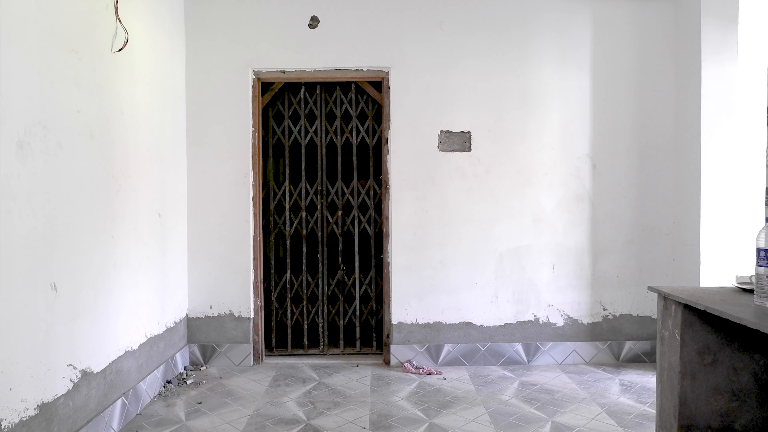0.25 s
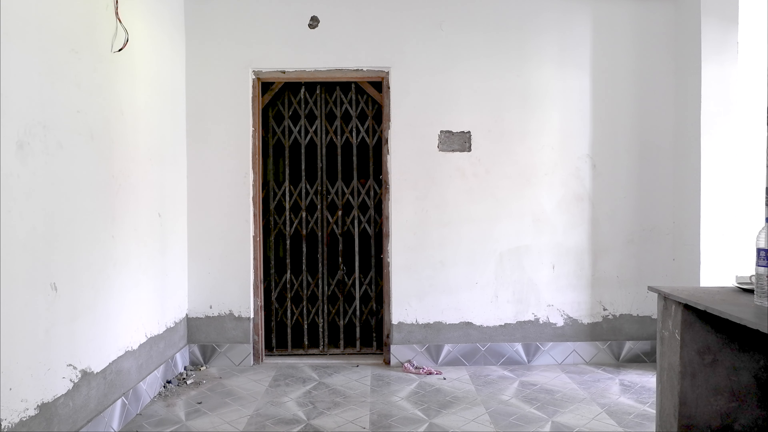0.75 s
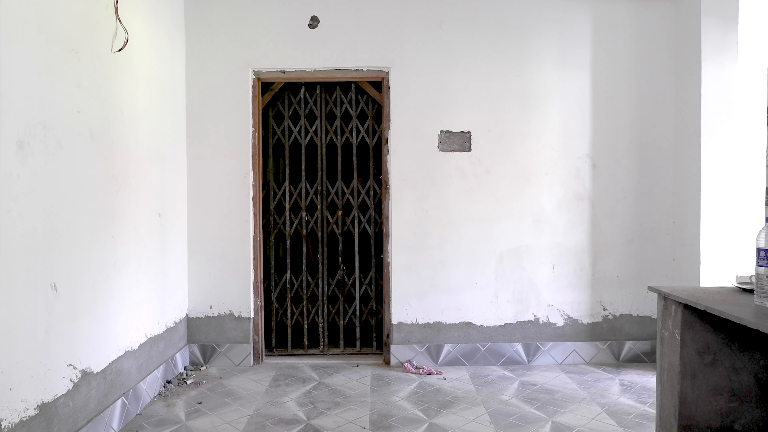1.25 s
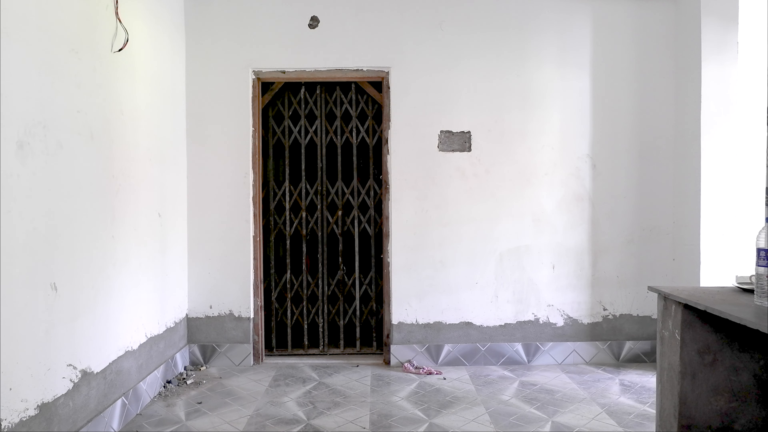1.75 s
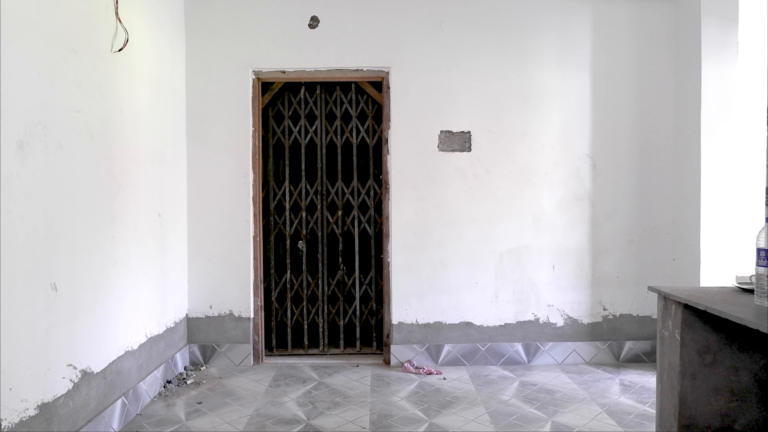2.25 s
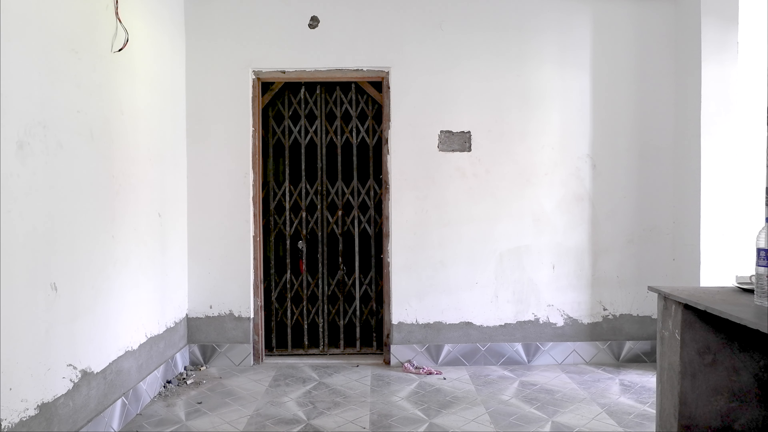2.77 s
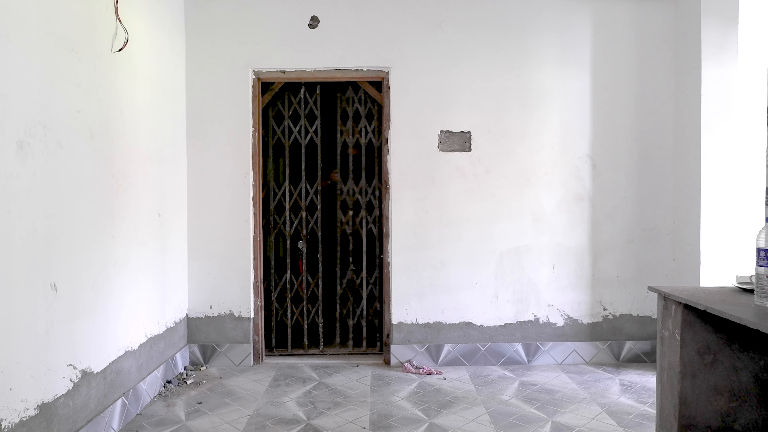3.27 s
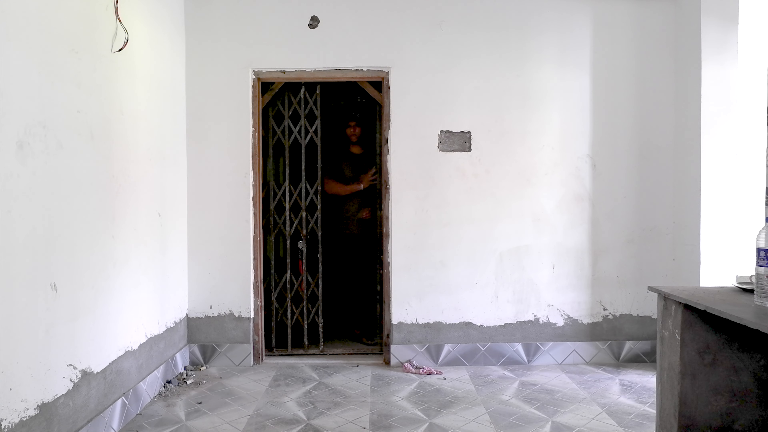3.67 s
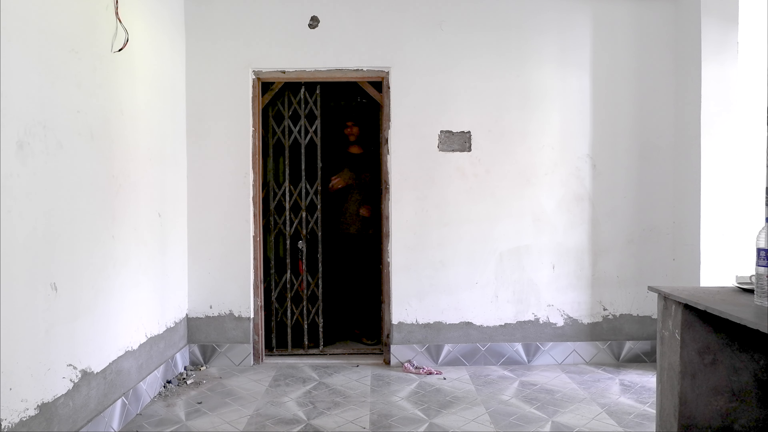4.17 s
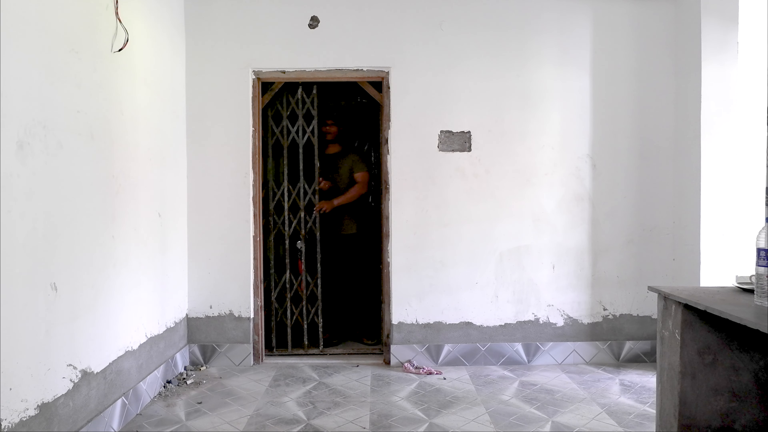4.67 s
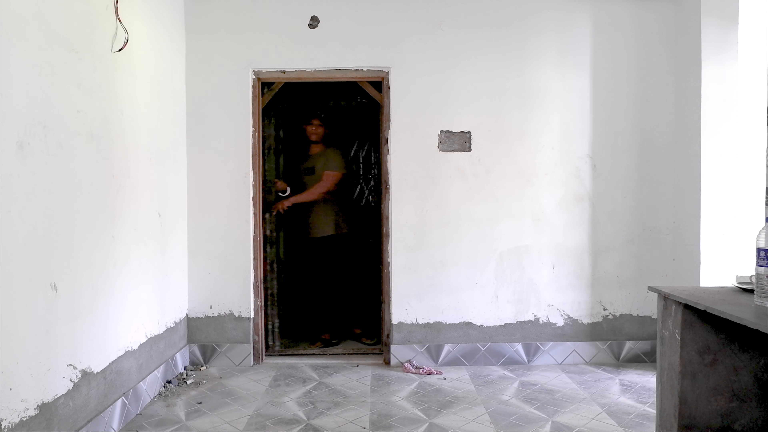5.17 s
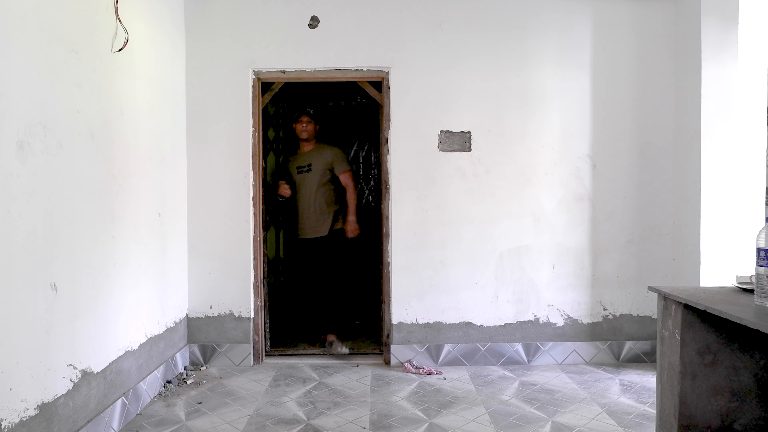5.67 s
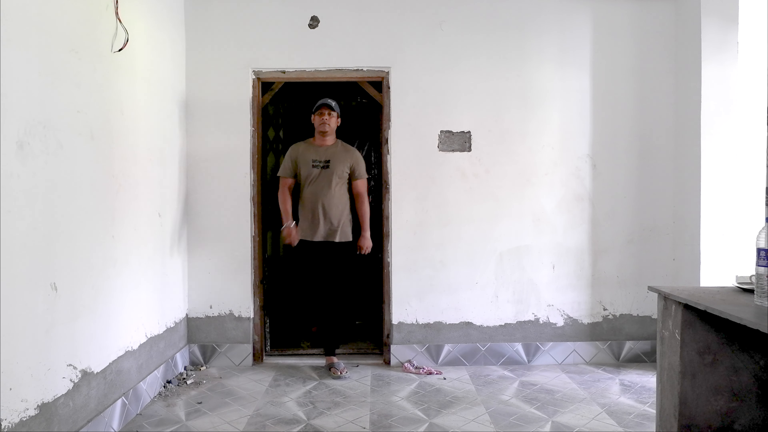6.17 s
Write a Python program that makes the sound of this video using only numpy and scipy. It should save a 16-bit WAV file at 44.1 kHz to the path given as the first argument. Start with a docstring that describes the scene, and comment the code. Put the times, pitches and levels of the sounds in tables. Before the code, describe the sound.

In a bare room with hard, echoing walls, a folding steel gate is unlatched a few metres away with sharp clacks, small clinks and short scrapes. One leaf rattles along its track and bumps in the frame. After a short lull the second leaf clatters aside with brief squeaks and a run of metallic strikes. A soft foot scuff follows, over quiet air and a faint drone.

```python
"""A steel latch scrapes and clacks free: a folding lattice gate, a few metres off in a bare plastered room.
Each leaf is pushed aside in turn. Stick-slip friction makes its runners grind and its links chatter,
and impacts excite the dense modes of the bars as they slam together. Last, a sandal brushes the floor.
The hard walls reverberate after every blow, over still air and a faint low drone."""
import sys
import numpy as np
from scipy import signal
from scipy.fft import rfft, irfft
from scipy.io import wavfile
from scipy.ndimage import uniform_filter1d

SR = 44100
rng = np.random.default_rng(int(sys.argv[2]) if len(sys.argv) > 2 else 0)


def pcm_store(signal):
    """Save signal as 16-bit PCM."""
    levels = np.round(np.clip(np.atleast_2d(signal), -1, 1) * 32767)
    wavfile.write(sys.argv[1], SR, levels.astype(np.int16).T)


N = 283641
T = np.arange(N) / SR
HZ = np.maximum(np.fft.rfftfreq(2 * N, 1 / SR), 1)

# spectrum of still air: frequency_hz, gain_db
AIR_SPECTRUM = [(15, -58), (25, -30.5), (107, -17), (156, -17), (188, -2), (260, -18), (289, -14),
                (469, -15.5), (762, -19), (997, -20), (2230, -27.5), (9550, -38), (10400, -39),
                (15500, -43)]
# bands of the drone: centre_hz, width_hz, gain_db
DRONE_BANDS = [(114.5, 9.4, -4.5), (187, 10.6, 1), (294, 25, -4.5)]
# stereo width of the background: frequency_hz, side_gain_db
AIR_SIDE = [(30, 1), (100, -35), (500, -18.5), (1000, -17.5), (3500, -4), (10000, 2)]
# reverberation time: frequency_hz, t60_s
ROOM_DECAY = [(125, 0.42), (500, 0.47), (1320, 0.51), (3480, 0.6), (9000, 0.44), (15000, 0.26)]
# stereo width of the echoes: frequency_hz, side_gain_db
ECHO_SIDE = [(100, -31), (350, -32.5), (900, -21.5), (2000, -25.5), (4500, -19.5), (11000, -8.5),
             (15000, -19.5)]
# a sandal brushes the floor: time_s, level_db
SHUFFLE_CURVE = [(6.04, -78), (6.111, -62), (6.2, -65.5), (6.246, -52), (6.28, -60), (6.33, -96)]
# spectrum of grit under the sole: frequency_hz, gain_db
SOLE_SPECTRUM = [(300, -13), (1000, 0.5), (3000, 1.5), (6500, 7.5), (10000, 1.5), (12000, -1), (14000, -13)]
# a leaf bumps in its frame: start_s, level_db
FRAME_BUMPS = [(3.60, -56), (3.67, -46.5), (3.72, -46), (3.83, -50), (3.925, -49), (4.09, -58), (4.83, -70),
               (5.21, -65), (5.50, -54.5)]
# modes of the frame: pitch_hz, level_db, t60_s
FRAME_RING = [(115.4, 5.9, 0.42), (141, 2, 0.15), (155.3, 16.8, 0.11), (233, 6, 0.17)]
# loose links touch: start_s, energy_db
LINK_TOUCHES = [(.819, -22), (0.924, -14.5), (0.952, -18), (1.122, -24), (1.184, -26), (5.791, -17)]
# modes of the links: pitch_hz, level_db, t60_s
LINK_RING = [(4020, -3, 0.17), (3940, -21, 0.34), (4490, -8, 0.12), (4590, -6.5, 0.067)]
# broad resonances of the links: centre_hz, width_hz, gain_db
LINK_BANDS = [(2600, 750, -3.5), (3090, 90, -2.5), (4620, 1100, 0.5), (4710, 960, -3)]
# a dry runner squeals: time_s, pitch_hz, level_db
SQUEAL_CURVE = [(5.34, 14300, -58), (5.357, 15000, -25), (5.38, 14900, -34.5), (5.405, 14900, -29),
                (5.425, 15100, -56)]
# a runner catches in the track: start_s, length_s, pitch_hz, level_db
RUNNER_JUDDERS = [(3.378, 0.13, 1076, -52), (3.495, 0.085, 1260, -49), (4.018, 0.075, 8680, -50.5),
                  (5.035, .07, 1107, -48.5), (5.063, 0.064, 428.6, -42.5), (5.085, .07, 694, -47),
                  (5.182, 0.21, 342, -51), (5.38, 0.054, 820, -44.5), (5.459, 0.036, 1083, -44)]
# how hard each leaf grinds along the track: time_s, effort_db
FIRST_EFFORT = [(3.15, -73), (3.31, -53.5), (3.41, -40.5), (3.52, -45), (3.61, -37), (3.71, -40),
                (3.79, -45.5), (3.89, -38.5), (3.96, -60), (4.12, -74)]
SECOND_EFFORT = [(4.782, -52), (4.86, -62), (5.0, -50), (5.08, -41), (5.25, -33.5), (5.35, -38.5),
                 (5.44, -32.5), (5.5, -44.5), (5.55, -48), (5.66, -71)]
# middle and low resonances of the track: centre_hz, width_hz, gain_db
GROAN_BANDS = [(610, 510, 11), (850, 870, -19), (1090, 220, 18.5), (1240, 560, -13)]
RUMBLE_BANDS = [(155, 85, 11), (260, 33, -8), (340, 280, 11), (405, 160, -1), (560, 67, -29)]
# taps on a small hard pin in the latch: start_s, level_db
PIN_TAPS = [(.570, -51), (.856, -59), (1.43, -74), (2.481, -49)]
# modes of the pin: pitch_hz, level_db, t60_s
PIN_RING = [(8330, -6, 0.4), (10150, 4.5, 0.16), (10730, -12, 0.29)]
# the latch bar is thrown: start_s, level_db
LATCH_THROWS = [(.114, -33.5), (.572, -61), (2.015, -56.5)]
# modes of the latch bar: pitch_hz, level_db, t60_s
LATCH_RING = [(2390, -22, 0.073), (2446, 15.5, 0.03), (2687, 18.5, 0.04), (2833, 7.5, 0.065),
              (3078, 7.5, 0.083)]
# response of the steel lattice: frequency_hz, gain_db
LATTICE_SPECTRUM = [(150, -62), (450, -19.5), (700, -16), (1100, -26), (1500, -17), (2000, -10), (2750, -2),
                    (3500, -5), (4500, -2), (5800, -7), (7800, -10.5), (9500, -17), (12500, -23.5),
                    (15500, -31)]
# the bolt or a bar rubs: start_s, length_s, level_db, lowest_hz, treble_db
STEEL_RUBS = [(0.065, 0.098, -45.5, 4370, 11), (0.433, 0.11, -54.5, 1950, 5),
              (2.267, 0.19, -45.5, 1860, 0.5), (2.353, 0.08, -44.5, 920, 8.5),
              (2.474, 0.02, -49.5, 1954, 12), (3.113, 0.18, -50, 3500, -13), (3.847, 0.073, -44.5, 960, 3),
              (4.383, 0.088, -48, 1010, 6)]
# steel strikes steel: start_s, energy_db, decay_s, lowest_hz, treble_db
STEEL_BLOWS = [(.129, 4, 0.063, 1040, 2), (.415, -14.5, 0.054, 1880, -3.5), (.571, -11, 0.099, 1940, -16),
               (1.68, -1.5, 0.035, 1580, -4), (1.705, -5, 0.075, 1210, -4.5), (1.886, -12, 0.16, 1410, -9),
               (2.013, 7.5, 0.089, 910, 0.5), (2.191, -5.5, 0.21, 1850, 3.5),
               (3.515, -5.5, 0.11, 1020, -34), (3.588, -7.5, 0.052, 1000, -5),
               (3.813, 2, 0.097, 1020, -2.5), (4.215, -23, 0.15, 975, -4), (4.829, -15, 0.073, 2570, -2),
               (4.854, -14, 0.075, 2600, 1.5), (5.051, -7, 0.13, 2340, -6), (5.102, -2, 0.072, 2370, -6.5),
               (5.314, -4, 0.106, 2650, 4.5), (5.393, -2, 0.092, 650, -3), (5.423, -7, 0.042, 3000, 5),
               (5.463, -2.5, 0.079, 980, 2)]


def undb(db):
    """Amplitude ratio of a level in decibels."""
    return 10 ** (np.asarray(db) / 20)


def unit(x):
    """Normalise to rms 1."""
    return x / np.sqrt(np.mean(x ** 2))


def at(points, hz):
    """Interpolate (frequency_hz, value) points on a log-frequency axis."""
    f, value = np.transpose(points)
    return np.interp(np.log(hz), np.log(f), value)


def add(track, s, sound):
    """Superpose a sound on the track at s seconds."""
    i = int(s * SR)
    track[i:i + len(sound)] += sound[:N - i]


def fade(times, db):
    """Amplitude envelope along a level curve, silent outside it."""
    return np.interp(T, times, np.ones(len(times)), 0, 0) * undb(np.interp(T, times, db))


def swell(s, length, db, softness=1.15):
    """Amplitude envelope of one smooth arch."""
    return undb(db) * np.abs(np.sin(np.pi * np.clip((T - s) / length, 0, 1))) ** softness


def linger(x, decay_s):
    """Exponential relaxation after each impulse."""
    return signal.lfilter([1], [1, -np.exp(-1 / (decay_s * SR))], x)


def colour(x, gain):
    """Minimum-phase filter with the given gain on the HZ grid."""
    cepstrum = irfft(np.log(gain + 1e-6))[:N]
    cepstrum[1:] *= 2
    return irfft(rfft(x, 2 * N) * np.exp(rfft(cepstrum, 2 * N)))[:N]


def above(x, hz, order=6):
    """High-pass: a body has no modes below its fundamental."""
    return signal.sosfilt(signal.butter(order, hz, "high", fs=SR, output="sos"), x)


def resonances(bands):
    """Gain of broad resonance peaks, at unit mean power."""
    return unit(sum(undb(db) / (1 + ((HZ - f) / (width / 2 + 1)) ** 2 / 2) for f, width, db in bands))


def ring(modes, length_s=0.93):
    """Modal impulse response: a sum of damped sinusoids."""
    t = T[:int(length_s * SR)]
    return sum(undb(db - 60 * t / t60) * np.sin(2 * np.pi * (f * t + rng.random()))
               for f, db, t60 in modes)


def convolve(x, response):
    """Output of a linear system driven by x."""
    return signal.fftconvolve(x, response)[:N]


def taps(events):
    """Impulse train from (start_s, level_db) rows."""
    force = np.zeros(N)
    for s, db in events:
        add(force, s, undb([db]))
    return force


def strike(events, modes, rise_s):
    """Free vibration after each tap; a soft contact makes the ring swell in."""
    response = ring(modes)
    onset = 1 - np.exp(-T[:len(response)] / rise_s)
    return convolve(taps(events), response * onset)


def grains(size, scatter_db):
    """Granular noise: dense tiny bursts of log-normal strength."""
    strength = np.repeat(rng.standard_normal(size // 32 + 1), 32)[:size]
    return unit(rng.standard_normal(size) * undb(scatter_db * strength))


def waver(depth_hz, smoothing):
    """Random frequency modulation, averaged over `smoothing` samples."""
    return depth_hz * unit(uniform_filter1d(rng.standard_normal(N), size=smoothing))


def background(air_db=-62, drone_db=-68):
    """Still air is broadband noise; the drone wavers as narrow-band noise does."""
    air = unit(colour(rng.standard_normal(N), undb(at(AIR_SPECTRUM, HZ))))
    drone = unit(colour(rng.standard_normal(N), resonances(DRONE_BANDS)))
    return undb(air_db) * air + undb(drone_db) * drone


def room(x, build_s=0.0052, gap_s=0.0026, size=32768, positions=44):
    """Diffuse reverberation from bare walls; the echo pattern shifts as the point of contact moves."""
    t = T[:size]
    hz = np.fft.rfftfreq(size, 1 / SR) + 1
    octaves = np.arange(7, 15)  # 128 Hz to 16 kHz
    bands = np.array([np.interp(np.log2(hz), octaves, row) for row in np.eye(len(octaves))])
    onset = 1 - np.exp(-np.maximum(t - gap_s, 0) / build_s)
    decays = onset * undb(-60 * t / at(ROOM_DECAY, 2. ** octaves)[:, None])
    echoes, hop = np.zeros(N), N // positions
    window = np.sin(np.pi * np.arange(2 * hop) / (2 * hop))
    for i in range(0, N - hop, hop):
        band_noise = irfft(rfft(rng.standard_normal(size)) * bands)
        tail = (band_noise * decays).sum(axis=0)
        piece = x[i:i + 2 * hop] * window[:N - i]
        add(echoes, i / SR, signal.fftconvolve(piece, tail / np.linalg.norm(tail)))
    return echoes


def shuffle():
    """Sliding friction on grit under a sandal."""
    grit = unit(colour(grains(N, scatter_db=1), undb(at(SOLE_SPECTRUM, HZ))))
    return fade(*np.transpose(SHUFFLE_CURVE)) * grit


def rattle(decay_s, rise_share=0.05, size=16384, lead=512):
    """Repeated rebound: slack joints bounce and settle, driving all frequencies evenly."""
    t = np.maximum(T[:size] - lead / SR, 0)
    envelope = (1 - np.exp(-t / (rise_share * decay_s))) * undb(-60 * t / decay_s)
    spectrum = rfft(grains(size, scatter_db=0.5) * envelope)
    return irfft(spectrum / np.abs(spectrum))[lead:size - 4 * lead]


def clinks(db_per_octave=15, ring_db=-20):
    """Light impacts excite only the modes of the short links; the lighter, the higher."""
    force = np.zeros(N)
    for s, db in LINK_TOUCHES:
        lowest_hz = 1340 * 2 ** (-db / db_per_octave)
        add(force, s, undb(db) * above(rattle(decay_s=0.08), lowest_hz))
    response = ring(LINK_RING)
    ringing = convolve(force, undb(ring_db) * response / np.linalg.norm(response))
    return colour(force + ringing, resonances(LINK_BANDS) / (1 + (HZ / 5000) ** 18))


def squeal():
    """Friction-excited oscillation: a dry runner gives a thin unsteady whistle."""
    s, hz, db = np.transpose(SQUEAL_CURVE)
    pitch_hz = np.interp(T, s, hz) + waver(depth_hz=45, smoothing=200)
    return np.sqrt(2) * fade(s, db) * np.sin(2 * np.pi * np.cumsum(pitch_hz) / SR)


def judders():
    """Stick-slip oscillation: a catching runner groans or squeaks on an unsteady pitch."""
    drift_hz = waver(depth_hz=50, smoothing=120)
    return sum(swell(s, length, db) * np.sin(2 * np.pi * np.cumsum(hz + drift_hz) / SR)
               for s, length, hz, db in RUNNER_JUDDERS)


def jangle(count=3200, t60_s=0.019, range_db=10, lowest_hz=1400, octaves=3.2):
    """Damped vibration: each riveted link rings for an instant at its natural frequency."""
    links = np.zeros(N)
    t = T[:2000]
    for when, pitch, strength in rng.random((count, 3)):
        hz = lowest_hz * 2 ** (octaves * pitch)
        envelope = undb(range_db * strength - 60 * t / t60_s)
        add(links, when * (N - 1) / SR, envelope * np.sin(2 * np.pi * hz * t))
    return unit(links)


def driven(offset_db, exponent, full_db=-38.5, ease_s=0.046):
    """Amplitude as a power law of effort; each leaf eases into motion and out of it."""
    gain = np.zeros(N)
    for s, db in map(np.transpose, (FIRST_EFFORT, SECOND_EFFORT)):
        moving = np.clip(np.minimum(T - s[0], s[-1] - T) / ease_s, 0, 1)
        gain += moving * fade(s, full_db + offset_db + exponent * (db - full_db))
    return gain


def slide(slips_per_s=170, crossover_hz=7000):
    """Stick-slip friction at the runners makes the links chatter and the track groan and rumble."""
    # each slip is a brief shower of tiny impacts
    slips = (rng.random(N) < slips_per_s / SR) * undb(rng.standard_normal(N))
    force = unit(grains(N, scatter_db=3.5) * (0.39 + linger(slips, decay_s=0.0037)))
    links = undb(-5) * force + undb(-7) * jangle()
    high = colour(links, 1 / (1 + (crossover_hz / HZ) ** 4)) * driven(offset_db=1.1, exponent=0.42)
    low = colour(links, 1 / (1 + (HZ / crossover_hz) ** 4)) * driven(offset_db=0, exponent=0.97)
    groan = colour(force * driven(offset_db=-17.5, exponent=1.07), resonances(GROAN_BANDS))
    # each bump leaves the track rumbling for a moment
    jolts = undb(-10) * linger(taps(FRAME_BUMPS), decay_s=0.069)
    rumble_gain = driven(offset_db=-27, exponent=0.86) + jolts
    rumble = colour(force * rumble_gain, resonances(RUMBLE_BANDS))
    return above(low + high, hz=880, order=3), above(groan + rumble, hz=84)


def latch():
    """Modal ringing of the thrown bar, spread out by its rattle, and of a small hard pin."""
    bar = convolve(strike(LATCH_THROWS, LATCH_RING, rise_s=0.0015), rattle(decay_s=0.077))
    return bar + strike(PIN_TAPS, PIN_RING, rise_s=0.0016)


def contact(force, lowest_hz, body_db, treble_db):
    """Contact sets the bandwidth: heavy ones drive the long bars' low modes, hard edges add treble."""
    hz = np.fft.rfftfreq(len(force), 1 / SR) + 1
    tilt_db = body_db * at([(1200, 1), (2400, 0)], hz) + treble_db * at([(4600, 0), (10000, 1)], hz)
    return above(irfft(rfft(force) * undb(tilt_db), len(force)), lowest_hz)


def scrapes(body_db=17, size=16384):
    """Friction force of short steel rubs, which drive the low modes more than a blow does."""
    force = np.zeros(N)
    for s, length, db, lowest_hz, treble_db in STEEL_RUBS:
        rub = grains(size, scatter_db=3) * swell(0, length, db)[:size]
        add(force, s, contact(rub, lowest_hz, body_db, treble_db))
    return force


def clacks(body_db=5.5, size=8192):
    """Impact force with backlash: the joints take up their slack, then the blow lands."""
    swell_lead_s, swell_db = 0.028, -46
    slack_lead_s, slack_db, slack_hz = 0.0095, -11.5, 1710
    force = np.zeros(N)
    for s, db, decay_s, lowest_hz, treble_db in STEEL_BLOWS:
        # a faint swell of noise softens the start of each clack
        noise = grains(size, scatter_db=3) * swell(0, 2 * swell_lead_s, db + swell_db)[:size]
        add(force, s - swell_lead_s, contact(noise, slack_hz, body_db, treble_db))
        slack = contact(rattle(decay_s=0.048), slack_hz, body_db, treble_db)
        add(force, s - slack_lead_s, undb(db + slack_db) * slack)
        add(force, s, undb(db) * contact(rattle(decay_s), lowest_hz, body_db, treble_db))
    return force


def bars(force):
    """Modal overlap: the lattice's resonances are too dense and short to be heard singly."""
    return colour(force, unit(undb(at(LATTICE_SPECTRUM, HZ))))


def scene(room_db=-1, chatter_direct_db=-3, bump_room_db=-6):
    """Direct and reverberant sound superpose almost alike at two closely spaced points."""
    blows = clacks() + scrapes()
    chatter, track = slide()
    small_parts = latch() + track + judders() + clinks() + squeal() + shuffle()
    bumps = strike(FRAME_BUMPS, FRAME_RING, rise_s=0.031)
    direct = bars(blows + undb(chatter_direct_db) * chatter) + small_parts + bumps
    echoes = undb(room_db) * room(bars(blows + chatter) + small_parts + undb(bump_room_db) * bumps)
    mid = direct + echoes + background()
    # echoes from the side walls arrive 7.5 ms late, unequal at left and right
    side = colour(np.roll(echoes, 331), undb(at(ECHO_SIDE, HZ)))
    side += colour(background(), undb(at(AIR_SIDE, HZ)))
    return np.array([mid + side, mid - side])


def record(dry, hiss_db=-75, top_hz=15650):
    """Each microphone adds its own self-noise; a steep low-pass limits the bandwidth."""
    noisy = dry + undb(hiss_db) * rng.standard_normal(dry.shape)
    return signal.sosfilt(signal.ellip(12, .2, 80, top_hz, fs=SR, output="sos"), noisy)


dry = scene()
out = record(dry)
pcm_store(out)
```